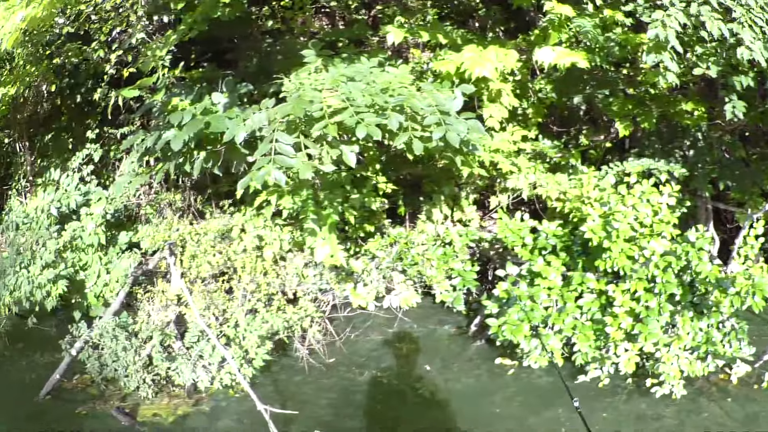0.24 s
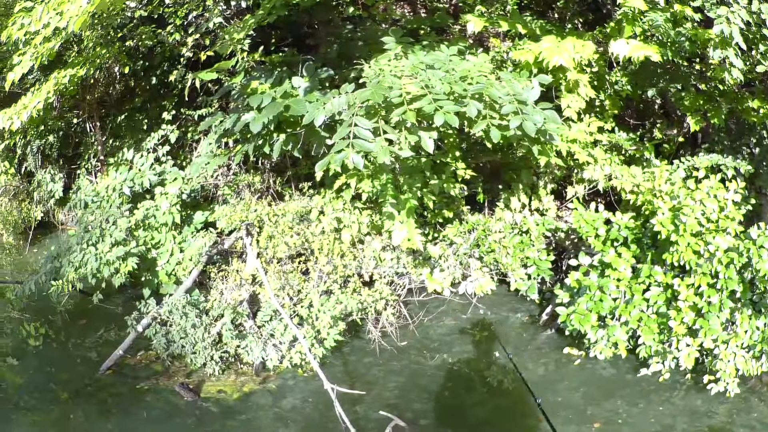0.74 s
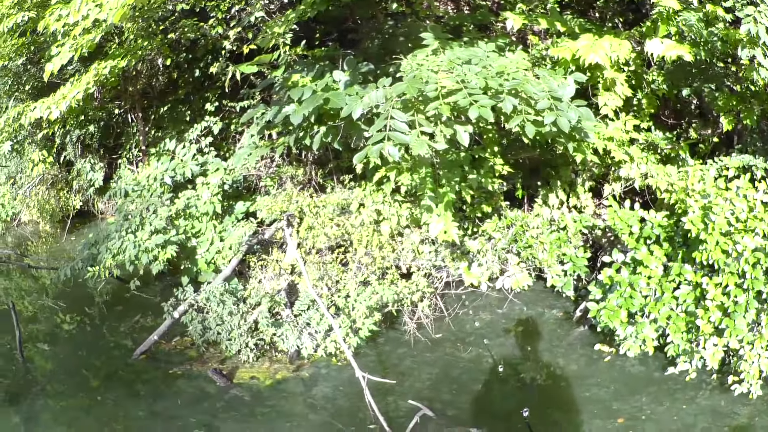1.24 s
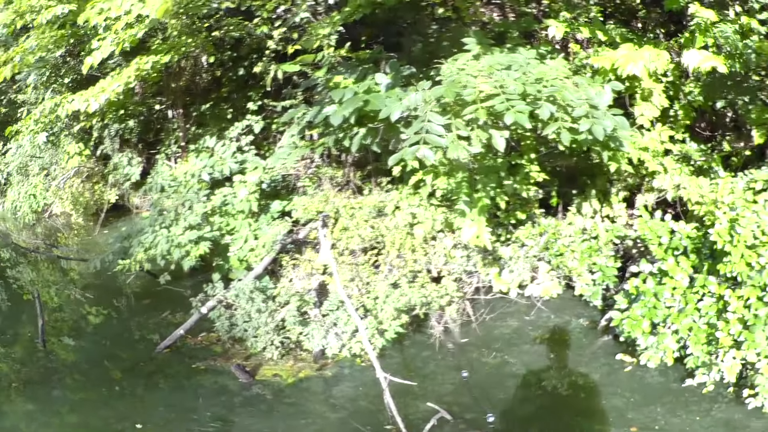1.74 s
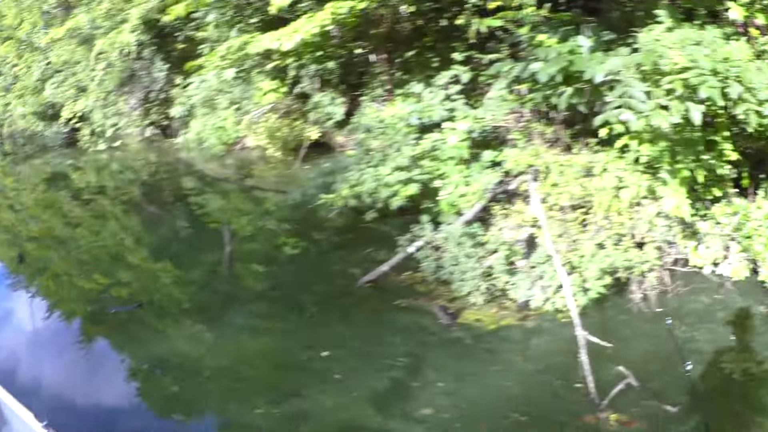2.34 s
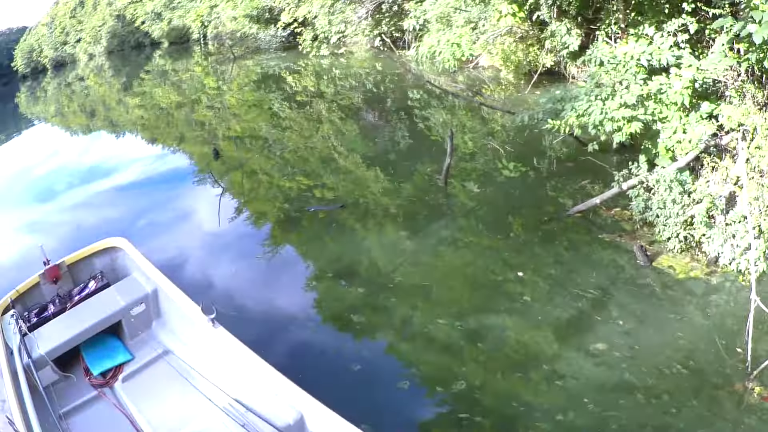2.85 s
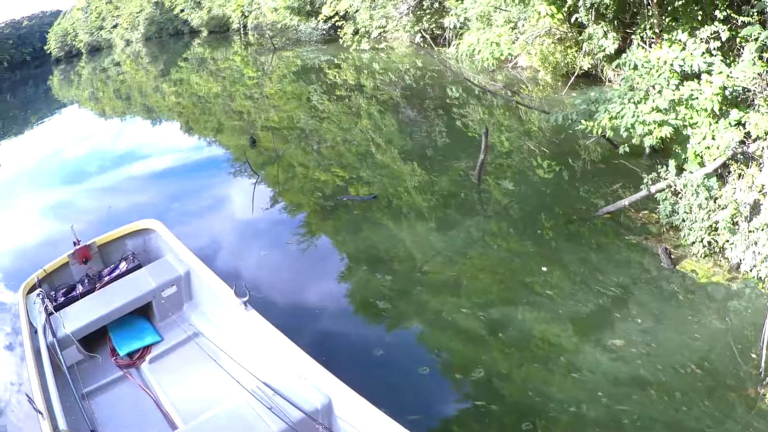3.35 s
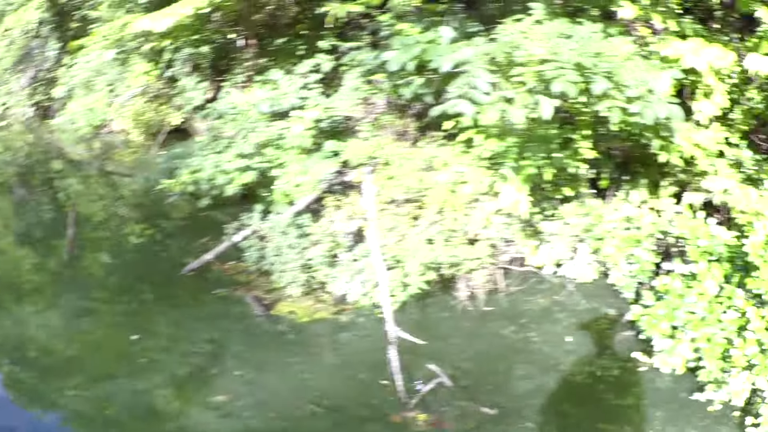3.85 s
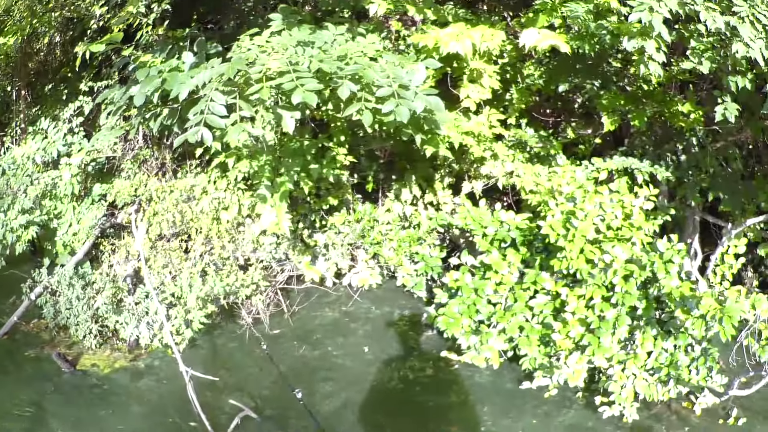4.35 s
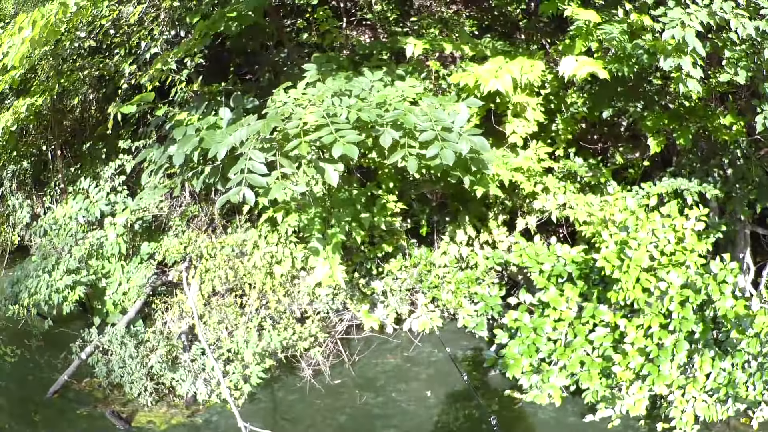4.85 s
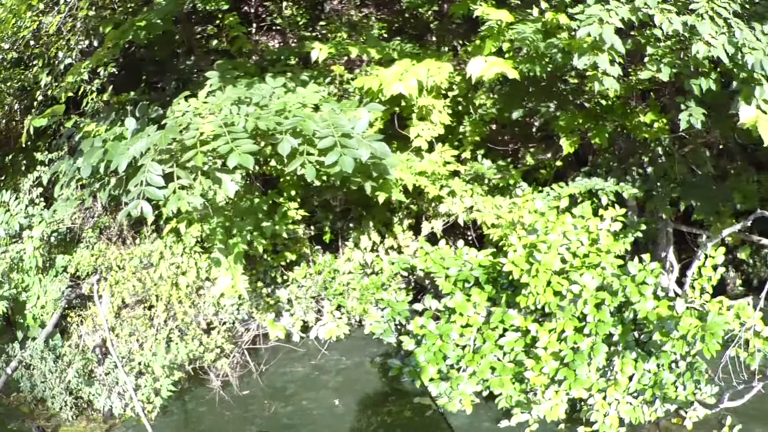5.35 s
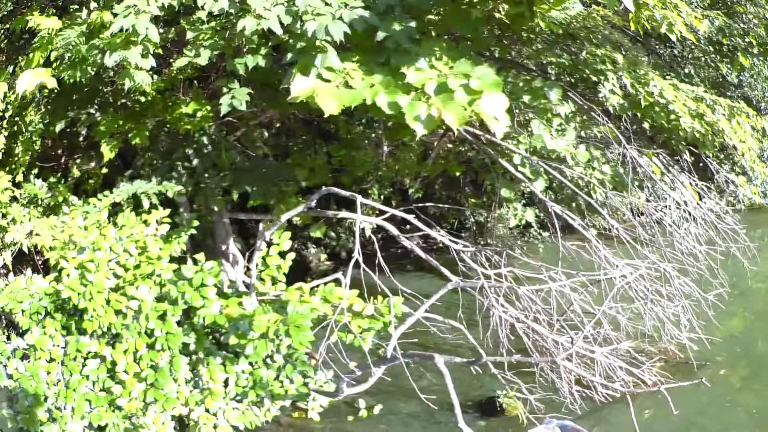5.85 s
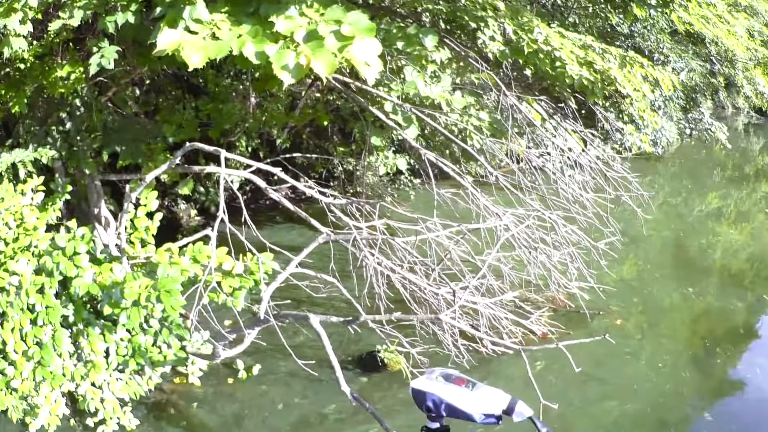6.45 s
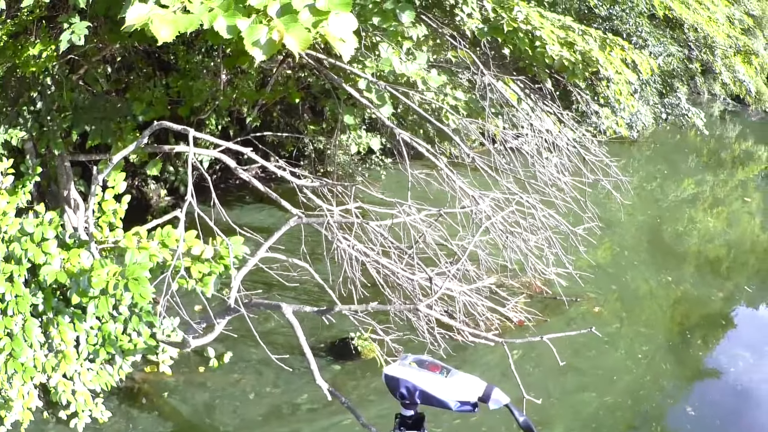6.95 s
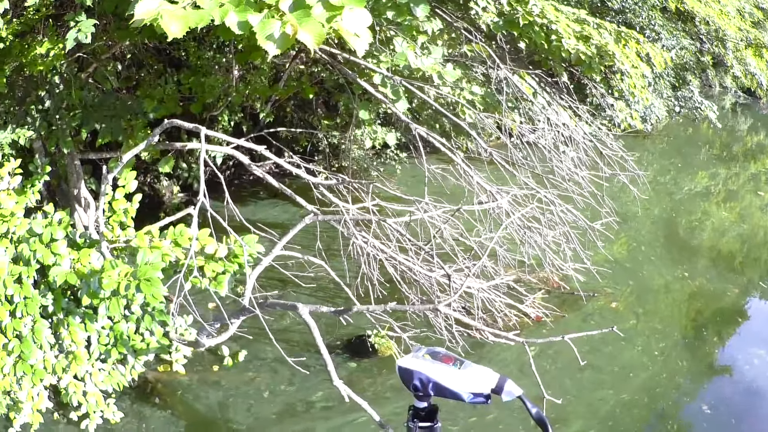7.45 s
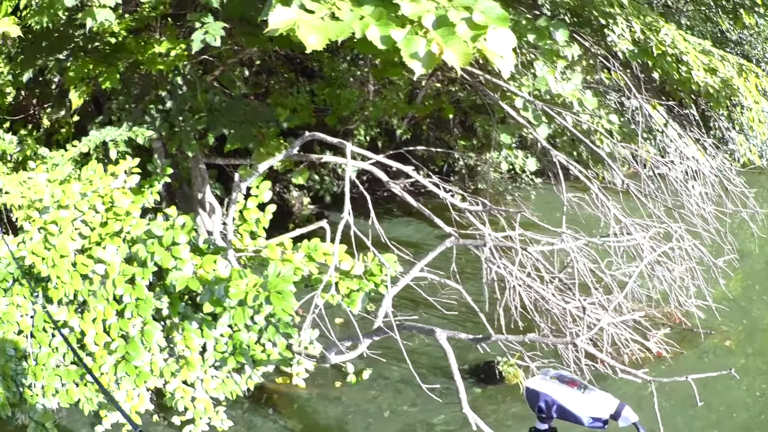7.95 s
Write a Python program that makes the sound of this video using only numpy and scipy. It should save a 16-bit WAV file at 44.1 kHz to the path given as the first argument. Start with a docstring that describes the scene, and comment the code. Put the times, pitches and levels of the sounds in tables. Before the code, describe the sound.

A bright, grainy cicada drone around seven to nine kilohertz runs throughout: a distant fluttering chorus plus two steady, rapidly throbbing singers, fullest from about 2.5 to 4 seconds, then fainter. Beneath lie low soft air and thin hiss. Small tackle clicks tick at 0.3 to 0.65. Another rough buzz swells from 0.8, sinks slightly in pitch overall and stops near 5. Dull, scuffing metal hull bumps come at 1.5 to 1.7, with weaker ones until 2.25. A loose part patters from 2.7 to 3.4, slowing at the end. The loudest muffled housing knock lands at 3.66, with clicks just after; another hits at 5.47. Cloth swishes softly from 2.4 and more clearly from 5.3 to 6.5, with short scratches. Crisp clicks stand out at 5.85 and, strongest, 7.63. A faint far bird chips at 0.6, 2.4, 4.2, 5.25 and 6.8. Close sounds are boxy, nearly mono, without deep bass.

```python
"""A lake shore with trees, heard from a small metal boat by one microphone in a sealed camera housing.
Cicadas: a far chorus of coloured noise, two steady singers made of clicks chopping a body tone, and
one buzz of narrow noise that slides down in pitch and stops. Close by, the hull is bumped, a loose part
rattles, the housing is knocked and tackle clicks, all as struck ringing modes; clothes and line rustle
as shaped noise. A far bird chips in blurred tones, over a bed of air noise and hiss."""
import sys
import numpy as np
from scipy import signal
from scipy.fft import rfft, irfft, next_fast_len
from scipy.io import wavfile

SR = 44100
rng = np.random.default_rng(int(sys.argv[2]) if len(sys.argv) > 2 else 0)


def pcm_store(signal):
    """Save signal as 16-bit PCM."""
    levels = np.round(np.clip(np.atleast_2d(signal), -1, 1) * 32767)
    wavfile.write(sys.argv[1], SR, levels.astype(np.int16).T)


N = 362061


def amp(db):
    """Gain of a level in dB."""
    return 10 ** (np.asarray(db) / 20)


def unit(x):
    """Scaled to rms 1."""
    return x / np.sqrt(np.mean(x ** 2) + 1e-20)


def in_time(rows):
    """The columns of a table after its time column, interpolated to one value a sample."""
    s, *columns = np.transpose(rows)
    return [np.interp(np.arange(N) / SR, s, column) for column in columns]


def colour(x, spectrum):
    """x shaped by a spectrum, drawn straight between its points on a log pitch axis; rms 1."""
    size = next_fast_len(N)
    bin_hz = np.arange(size // 2 + 1) * SR / size
    hz, db = np.transpose(spectrum)
    gain = amp(np.interp(np.log(bin_hz + 1), np.log(hz), db, left=-120, right=-120))
    return unit(irfft(rfft(x, size) * gain, size)[:N])


def noise(spectrum):
    """Steady noise of a given colour; rms 1."""
    return colour(rng.standard_normal(N), spectrum)


def drift(rate):
    """Slow random wandering of rms 1, smoothed by two poles at a rate in Hz."""
    r = np.exp(-2 * np.pi * rate / SR)
    wander = signal.lfilter([1], [1, -2 * r, r * r], rng.standard_normal(N + SR))
    return unit(wander[SR:])   # the first second only settles the filter


def ring(x, hz, t60):
    """One resonant mode: a unit click sets off a sine of height 1 that falls 60 dB in t60 seconds."""
    r, w = amp(-60 / (t60 * SR)), 2 * np.pi * hz / SR
    return signal.lfilter([0, np.sin(w)], [1, -2 * r * np.cos(w), r * r], x + 1e-18)


def low(x, hz, order=2):
    """Low-pass."""
    return signal.sosfilt(signal.butter(order, hz, fs=SR, output="sos"), x)


def high(x, hz, order):
    """High-pass."""
    return signal.sosfilt(signal.butter(order, hz, "high", fs=SR, output="sos"), x)


def add(out, s, x):
    """Mixes x in at time s."""
    i = round(s * SR)
    out[i:i + len(x)] += x[:N - i]


def swell(start, attack, stop, release):
    """Gain that rises from start, holds until stop and falls away."""
    t = np.arange(N) / SR
    return np.clip(np.minimum((t - start) / attack, 1 + (stop - t) / release), 0, 1)


def buzz_band(hz, width_hz):
    """Rough noise in one resonance around a moving pitch; rms 1."""
    tone = np.exp(2j * np.pi * np.cumsum(hz) / SR)
    a, b = low(rng.standard_normal((2, N)), width_hz, order=4)
    return unit(a * tone.real + b * tone.imag)


# Colour of the low air noise. Each row: pitch in Hz, relative level in dB per Hz.
AIR_COLOUR = [(12, -20), (20, -4), (88, -0.5), (162, 1.5), (195, -1.5), (300, -1.5), (432, -4), (462, -3.5),
              (914, -8), (1170, -7), (3050, -21.5), (4600, -53), (5980, -82), (10100, -120)]
# Colour of the high hiss. Each row: pitch in Hz, relative level in dB per Hz.
HISS_COLOUR = [(4500, -100), (4800, -22.5), (5200, -20), (5600, -48), (6500, -14), (10500, -9),
               (12500, -9.5), (14700, -1.5), (16000, 0.5)]
AIR_DB, HISS_DB = -52.5, -65


def air_and_hiss():
    """A low wash of air under a high hiss, both noise whose levels waver at random."""
    air = amp(AIR_DB + 0.94 * drift(11.5)) * noise(AIR_COLOUR)
    hiss = amp(HISS_DB + 1.5 * drift(150)) * noise(HISS_COLOUR)
    return air + hiss


# Colour of what differs between the channels. Each row: pitch in Hz, relative level in dB per Hz.
WIDE_COLOUR = [(12, -29), (20, 3), (116, 1.5), (1600, -7), (2720, -15.5), (3310, -59), (10700, -49),
               (13000, -44), (14100, -10), (15800, -4)]
WIDE_DB = -70


def channel_difference():
    """Faint noise of opposite sign in the two channels."""
    return amp(WIDE_DB) * noise(WIDE_COLOUR) * [[1], [-1]]


# Level of all the steady song as the listener turns. Each row: time in seconds, level in dB.
SONG_LEVEL = [(0.0, -49), (0.04, -51.5), (1.0, -49), (1.1, -50.5), (1.62, -47), (2.17, -48.5),
              (2.58, -45.5), (3.82, -45), (4.09, -47.5), (5.14, -51.5), (5.35, -50), (5.42, -52.5),
              (7.87, -53), (8.21, -51)]
WAVER_DB = 0.84


def song_level():
    """Level in dB shared by the far chorus and the two steady singers, with a slow waver."""
    return in_time(SONG_LEVEL)[0] + WAVER_DB * drift(2.7)


# Colour of the far cicadas. Each row: pitch in Hz, relative level in dB per Hz.
CHORUS_COLOUR = [(3410, -80), (5800, -42), (6100, -28), (6400, -21.5), (6540, -18.5), (7070, -6.5),
                 (8480, 0), (8970, -7), (9540, -9), (11000, -27.5), (14300, -40), (22000, -120)]
CHORUS_DB = -3.0   # against the song level


def far_chorus(song_db):
    """Many distant singers merge into coloured noise whose level flutters at two rates."""
    flutter_db = 1.0 * drift(19.0) + 1.0 * drift(55)
    return amp(song_db + CHORUS_DB + flutter_db) * noise(CHORUS_COLOUR)


# Chips of a far bird. Each row: start in seconds, length in seconds, final pitch in Hz, level in dB.
BIRD_CHIPS = [(.34, 0.12, 5000, -84), (0.584, 0.055, 3070, -64), (2.367, 0.062, 3060, -63),
              (4.24, 0.056, 2630, -71), (5.251, 0.071, 3140, -63.5), (6.818, 0.076, 3110, -60.5)]
CHIP_DROP, CHIP_ATTACK = .15, .45   # starting pitch above the final one, attack; shares of pitch and length
CHIP_BLUR_HZ = 230                  # reach of the blur to each side of the pitch
CHIP_TAIL_DB, CHIP_TAIL_S = -15, 0.059


def bird():
    """Far chips that drop into their pitch, blurred by the trees into narrow noise with a trailing tail."""
    out, lag = np.zeros(N), np.arange(SR // 4) / SR
    grits = rng.standard_normal((len(BIRD_CHIPS), 2, SR // 2))
    for (s, length, hz, db), grit in zip(BIRD_CHIPS, grits):
        attack = np.minimum(lag / (CHIP_ATTACK * length), 1)
        chip = attack * np.exp(-np.maximum(lag - 0.74 * length, 0) / (0.28 * length))
        tail = np.minimum(lag / length, 1) * np.exp(-np.maximum(lag - length, 0) / CHIP_TAIL_S)
        shape = chip + amp(CHIP_TAIL_DB) * tail
        falling_hz = hz * (1 + CHIP_DROP * np.exp(-lag / (0.25 * length)))
        phase = 2 * np.pi * np.cumsum(falling_hz) / SR
        a, b = unit(low(grit, CHIP_BLUR_HZ, order=4))[:, -len(lag):]
        add(out, s, amp(db) * shape * (a * np.cos(phase) + b * np.sin(phase)))
    return out


# Strokes of cloth and line, close by. Each row: start in seconds, length in seconds, level in dB.
STROKES = [(2.397, 1.06, -62.5), (3.68, .27, -64.5), (4.21, .5, -60), (5.334, 0.54, -54), (5.98, 0.52, -57),
           (7.812, .45, -68)]
# Colour of the strokes. Each row: pitch in Hz, relative level in dB per Hz.
CLOTH_COLOUR = [(400, -31), (700, -2), (900, 6.5), (1300, -5), (2100, -4), (2550, -3), (2950, -19),
                (3600, -18.5), (4500, -43)]
# Short scratches of line and cloth. Each row: start in seconds, level in dB, dying time in seconds.
LINE_SCRATCHES = [(1.949, -51, 0.0055), (1.989, -48, 0.013), (4.256, -53, 0.01), (5.549, -47.5, 0.037),
                  (5.685, -44, 0.021), (5.719, -45.5, 0.011), (6.068, -47, 0.042), (6.107, -50, 0.021),
                  (6.292, -47.5, 0.029), (6.415, -42.5, 0.014), (6.484, -42, 0.0052), (6.509, -52.5, 0.011),
                  (7.693, -48, 0.011), (7.779, -46, 0.0056), (8.049, -50, 0.022)]
# Colour of the scratches. Each row: pitch in Hz, relative level in dB per Hz.
SCRATCH_COLOUR = [(500, 10), (900, 9.5), (1800, 7), (2800, 0), (3700, -8.5), (4500, -47)]
STROKE_ATTACK_S, STROKE_RELEASE_S = 0.065, 0.089


def rustle():
    """Clothes and line swish in soft strokes of grainy noise, with a few short scratches."""
    strokes = sum(amp(db) * swell(s, STROKE_ATTACK_S, s + length, STROKE_RELEASE_S)
                  for s, length, db in STROKES)
    grain = rng.standard_normal(N) * amp(3.0 * drift(120))
    swish = strokes * colour(grain, CLOTH_COLOUR)
    scratching, lag = np.zeros(N), np.arange(SR // 10) / SR
    for s, db, dying in LINE_SCRATCHES:
        onset = np.minimum(lag / 0.00072, 1)
        add(scratching, s, amp(db) * np.exp(-lag / dying) * onset)
    return swish + scratching * noise(SCRATCH_COLOUR)


# Clicks of tackle in the boat, and just after the knock at 3.76 s a few more that carry on its buzz. Each row:
# start in seconds, level of the main mode in dB, its pitch in Hz.
TACKLE_CLICKS = [(0.31, -47, 1400), (0.452, -46.5, 1340), (0.64, -42.5, 1280), (3.729, -41, 1210),
                 (3.776, -37, 1320), (3.795, -40, 1250), (5.402, -49, 900), (5.854, -34, 1390),
                 (6.038, -43.5, 830), (6.065, -43, 1870), (6.105, -38, 930), (6.439, -43, 902),
                 (7.635, -27.5, 1207), (8.095, -45.5, 1130)]
CLICK_T60_S = 0.033


def tackle():
    """Small clicks that ring in three modes tied to their pitch."""
    out, tick = np.zeros(N), (np.arange(SR // 8) == 0) * 1.
    for s, db, hz in TACKLE_CLICKS:
        main = ring(tick, hz, CLICK_T60_S)
        lower = 0.59 * ring(tick, 0.836 * hz, CLICK_T60_S)
        upper = 0.35 * ring(tick, 1.21 * hz, 0.28 * CLICK_T60_S)
        add(out, s, amp(db) * (main + lower + upper))
    return out


# Taps of a loose part, in the end slowing down. Each row: time in seconds, strength in dB.
RATTLE_TAPS = [(2.699, -48), (2.764, -42.5), (2.805, -45), (2.854, -48), (2.901, -42.5), (2.943, -40),
               (2.991, -43), (3.043, -41), (3.11, -39.5), (3.182, -37.5), (3.255, -42), (3.365, -41.5)]
# Modes of the loose part. Each row: pitch in Hz, relative strength in dB, 60 dB decay time in seconds.
RATTLE_MODES = [(200, -17, .05), (404, -2.5, 0.16), (468, -0.5, 0.094), (720, 5.5, 0.03), (1160, 2, .012),
                (1520, 8, 0.017), (1950, 5, .008)]
TAP_S, TAP_GRIT = .0005, 1.6   # dying time of a tap's contact in seconds, grit relative to the smooth push


def rattle():
    """Every soft, gritty tap strikes the modes with strengths of its own."""
    s, db = np.transpose(RATTLE_TAPS)
    out, spread_db = np.zeros(N), rng.normal(0, 0.92, (len(s), len(RATTLE_MODES)))
    fade = np.exp(-1 / (TAP_S * SR))
    for (hz, mode_db, t60), own_db in zip(RATTLE_MODES, spread_db.T):
        taps = np.zeros(N)
        taps[(s * SR).astype(int)] = amp(db + mode_db + own_db) * (1 - fade)
        contact = signal.lfilter([1], [1, -fade], taps)
        out += ring(contact * (1 + TAP_GRIT * rng.standard_normal(N)), hz, t60)
    return out


# Bumps on the hull. Each row: start in seconds, push in dB, dying time of the contact in seconds.
HULL_BUMPS = [(1.502, -38, 0.023), (1.53, -39, 0.017), (1.604, -60, 0.017), (1.704, -41.5, 0.022),
              (1.759, -57.5, 0.028), (1.844, -56, 0.014), (2.044, -51.5, 0.037), (2.109, -59.5, 0.017),
              (2.168, -62.5, 0.01), (2.248, -67, 0.031)]
# Modes of the plates. Each row: pitch in Hz, relative strength in dB, 60 dB decay time in seconds.
HULL_MODES = [(156.5, -16.5, 0.202), (232, -8.5, 0.11), (291.2, -5.5, 0.21), (358, -3.5, 0.058),
              (447, -3, 0.048), (543, -15, 0.14), (605, -9.5, 0.05), (705, -14.5, 0.1), (793, -8.5, 0.058),
              (990, -10, 0.024), (1086, -10, 0.038), (1285, -6.5, 0.02), (1540, -10, 0.022),
              (1736, -4, 0.017), (2270, -3.5, 0.018)]
BUMP_BRIGHT_HZ = 1230   # the scuff is low-passed here


def hull():
    """Each bump is a short scuffing contact that sets the plates ringing; thin plates give no deep bass."""
    push, lag = np.zeros(N), np.arange(SR // 10) / SR
    grits = rng.standard_normal((len(HULL_BUMPS), len(lag)))
    for (s, db, contact), grit in zip(HULL_BUMPS, grits):
        hit_and_grit = grit + 4.1 * (lag == 0)
        scuff = low(hit_and_grit * np.exp(-lag / contact), BUMP_BRIGHT_HZ)
        energy = np.sum(scuff ** 2) * BUMP_BRIGHT_HZ / SR * 4
        add(push, s, amp(db) * scuff / np.sqrt(energy))
    plates = sum((-1) ** k * amp(db) * ring(push, hz, t60)
                 for k, (hz, db, t60) in enumerate(HULL_MODES))
    return high(plates, 130, order=4)


# Knocks right on the housing. Each row: start in seconds, then strengths of snap, thud and buzz in dB.
HOUSING_KNOCKS = [(1.888, -44, -30.5, -30), (1.934, -41, -32, -28), (2.29, -45, -35, -30),
                  (3.658, -6, -14, -7), (3.745, -43, -25, -24), (3.761, -50, -37, -22),
                  (3.854, -39, -28, -18), (3.878, -43, -30, -40), (5.465, -14.5, -14, -12),
                  (5.543, -43, -28.5, -40.5), (5.852, -35, -28, -25), (5.863, -34, -35, -52)]


def knocks():
    """A snap of the shell, a thud that pushes on the microphone and a short buzz of loose parts."""
    out, lag = np.zeros(N), np.arange(SR // 6) / SR
    tick = (lag == 0) * 1.
    dent = ring(tick, 1100, .002)
    rebound = ring(np.roll(tick, round(SR / 2000)), 850, .002)   # half a millisecond later
    snap = 2.16 * rebound - 0.75 * dent + 0.21 * ring(tick, 264, 0.043)
    die = np.exp(-lag / 0.013)
    grits = rng.standard_normal((len(HOUSING_KNOCKS), 2, len(lag)))
    for (s, snap_db, thud_db, buzz_db), grit in zip(HOUSING_KNOCKS, grits):
        thud = -low(ring(tick, 66, 0.025), 450) + 0.085 * ring(grit[0], 205, 0.017) * die
        buzz = 0.041 * ring(grit[1], 1200, 0.0041) * die
        add(out, s, amp(snap_db) * snap + amp(thud_db) * thud + amp(buzz_db) * buzz)
    return out


def through_housing(blows):
    """The sealed shell muffles the blows, and little deep bass comes through."""
    return high(low(blows, 1716, order=5), 50, order=2)


# The singer that runs down. Each row: time in seconds, body pitch in Hz, level in dB.
SLIDING_SONG = [(0.8, 7380, -58), (1.5, 7070, -56), (2.6, 6740, -57.5), (3.3, 6805, -50),
                (4.0, 6680, -61.5), (4.95, 6650, -62.5)]
SLIDE_WIDTH_HZ, SLIDE_SWELL_S = 350, 0.94
SLIDE_STOP_S, SLIDE_RELEASE_S = 4.95, 0.1
# a narrow lower band of the same buzz; its pitch is the one reached at the stop
UNDERTONE_HZ, UNDERTONE_WIDTH_HZ, UNDERTONE_DB = 6175, 85, -69.5
UNDERTONE_FROM_S, UNDERTONE_RISE_HZ_PER_S = 2.6, 76


def sliding_singer():
    """A rough buzz whose body pitch sinks overall; a narrow, rising undertone joins, and both stop together."""
    hz, level_db = in_time(SLIDING_SONG)
    body_swell = swell(SLIDING_SONG[0][0], SLIDE_SWELL_S, SLIDE_STOP_S, SLIDE_RELEASE_S)
    body = amp(level_db + 1.1 * drift(25)) * body_swell * buzz_band(hz, SLIDE_WIDTH_HZ)
    under_hz = UNDERTONE_HZ + UNDERTONE_RISE_HZ_PER_S * (np.arange(N) / SR - SLIDE_STOP_S)
    under_swell = swell(UNDERTONE_FROM_S, SLIDE_SWELL_S, SLIDE_STOP_S, SLIDE_RELEASE_S)
    undertone = amp(UNDERTONE_DB) * under_swell * buzz_band(under_hz, UNDERTONE_WIDTH_HZ)
    return body + undertone


# Colour of a steady singer. Each row: pitch in Hz, gain in dB.
SINGER_COLOUR = [(5900, -41), (6800, -16), (7100, -5.5), (7600, -7.5), (8500, 0), (8950, -4), (9500, -33),
                 (10600, 1.5)]
CLICK_HZ, THROB_HZ = 452.0, 95.0             # mean clicks a second, throbs a second
FIRST_BODY_HZ, SECOND_BODY_HZ = 7564, 7773   # mean body tones
SINGERS_DB, SECOND_SINGER_DB = -3.2, -3      # against the song level, against the first singer


def steady_singer(body_hz):
    """Regular clicks chop the body tone into a comb of lines; a throb swings its strength and pitch."""
    throb = 2 * np.pi * np.cumsum(THROB_HZ + 1.36 * drift(2.83)) / SR
    clicks = 2 * np.pi * np.cumsum(CLICK_HZ + 0.857 * drift(3.87)) / SR
    body = 2 * np.pi * np.cumsum(body_hz + 8.88 * drift(5.11)) / SR - 0.75 * np.sin(throb)
    # leaves and moving air scatter the lines: each fades and slips on its own
    lines = sum(amp(3.3 * drift(1.07)) * np.cos(body + k * clicks + 1.09 * drift(3.5))
                for k in range(-3, 5))
    return colour(lines * (1 + 0.54 * np.cos(throb)), SINGER_COLOUR)


def steady_singers(song_db):
    """Two singers of slightly different body pitch, the second a little weaker."""
    pair = steady_singer(FIRST_BODY_HZ) + amp(SECOND_SINGER_DB) * steady_singer(SECOND_BODY_HZ)
    return amp(song_db + SINGERS_DB) * pair


def scene():
    """Everything reaches one microphone; only a faint noise differs between the channels."""
    song_db = song_level()
    background = air_and_hiss() + far_chorus(song_db) + bird()
    blows = through_housing(tackle() + rattle() + hull() + knocks())
    mid = background + rustle() + blows + sliding_singer() + steady_singers(song_db)
    return mid + channel_difference()


def record(dry):
    """A steep low-pass cuts the top above 15750 Hz."""
    return signal.sosfilt(signal.ellip(12, .5, 70, 15750, fs=SR, output="sos"), dry)


dry = scene()
out = record(dry)
pcm_store(out)
```